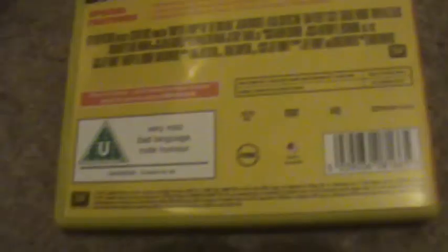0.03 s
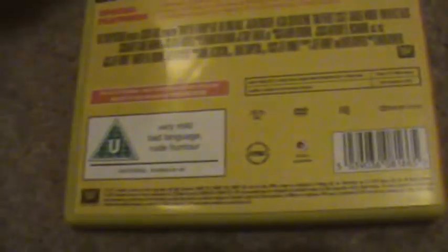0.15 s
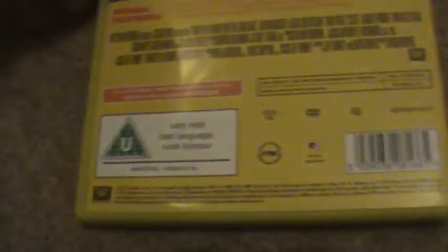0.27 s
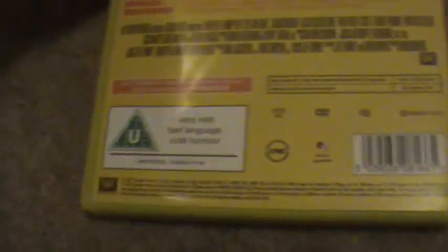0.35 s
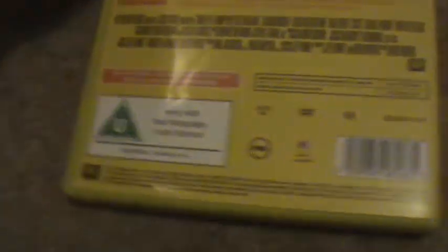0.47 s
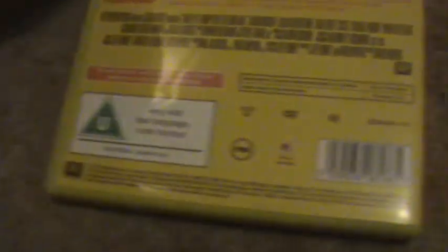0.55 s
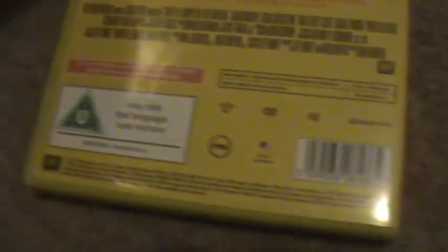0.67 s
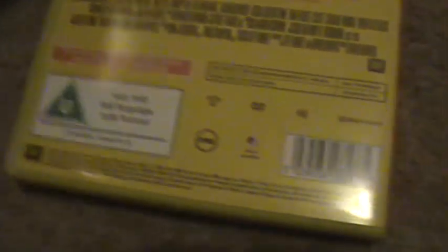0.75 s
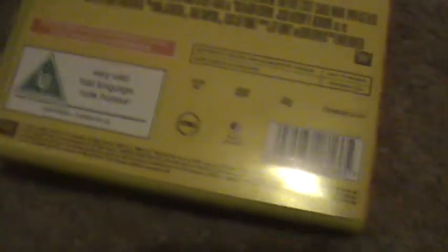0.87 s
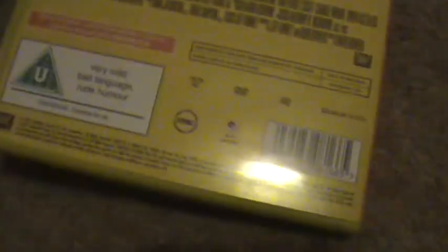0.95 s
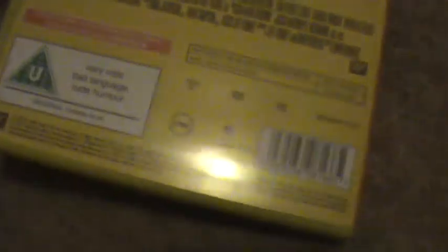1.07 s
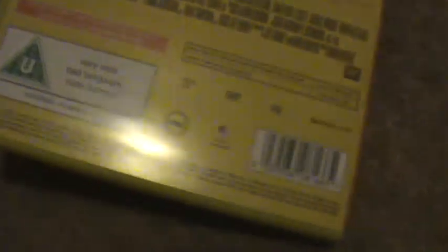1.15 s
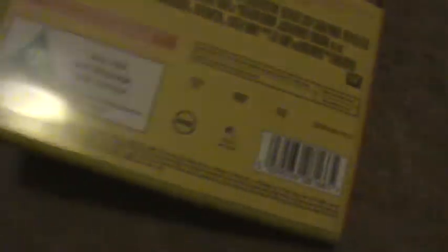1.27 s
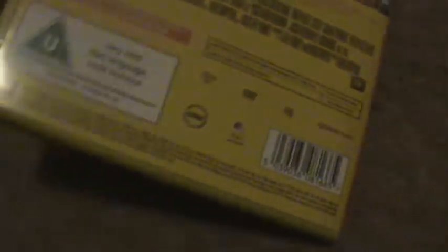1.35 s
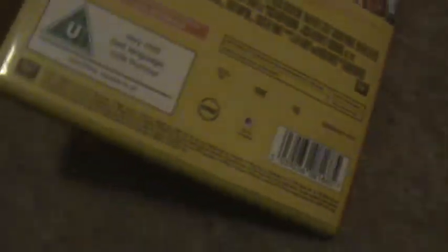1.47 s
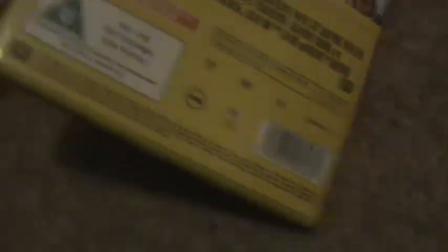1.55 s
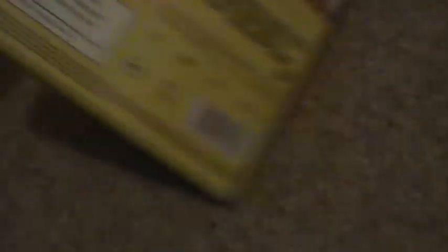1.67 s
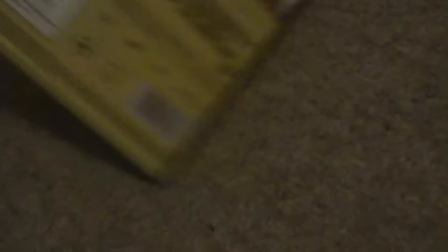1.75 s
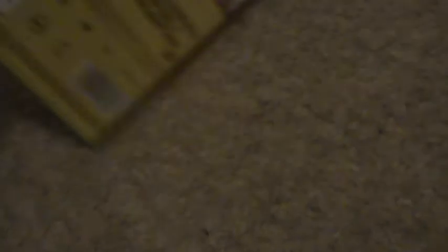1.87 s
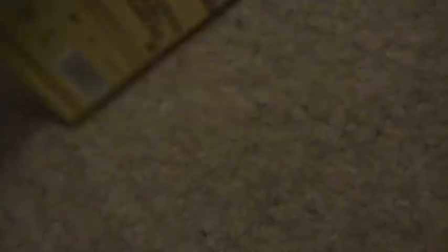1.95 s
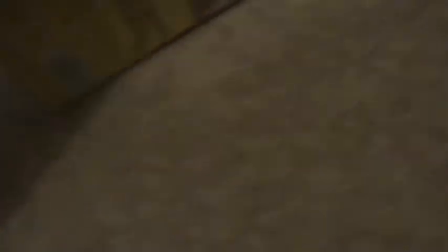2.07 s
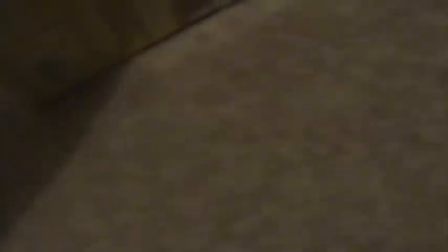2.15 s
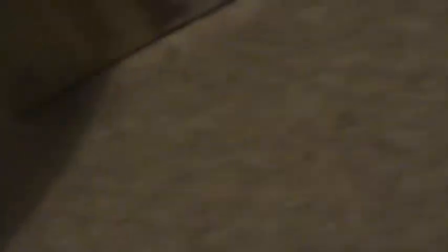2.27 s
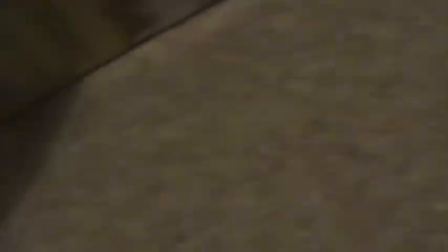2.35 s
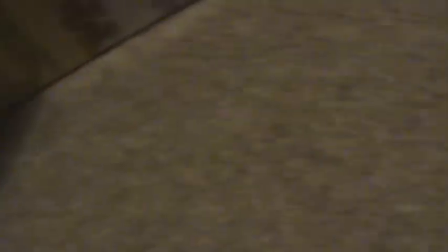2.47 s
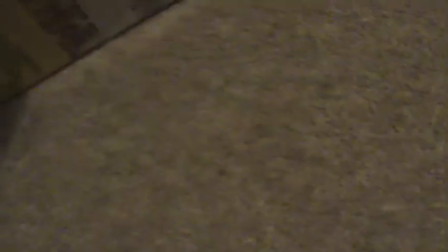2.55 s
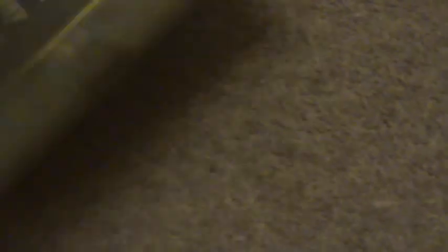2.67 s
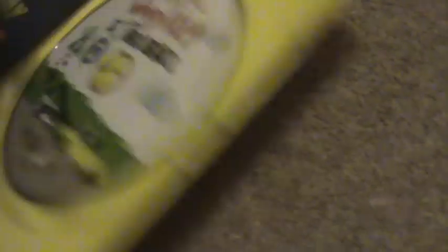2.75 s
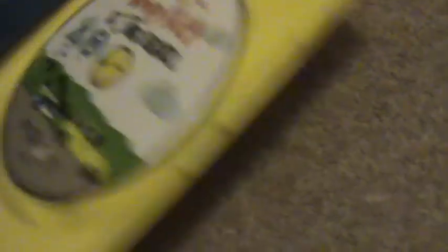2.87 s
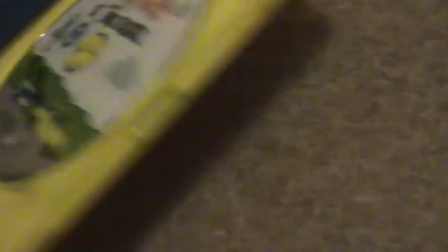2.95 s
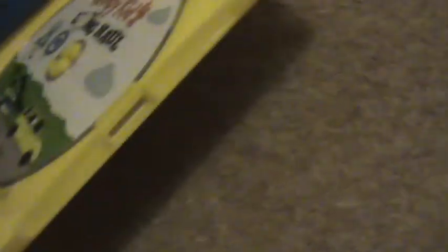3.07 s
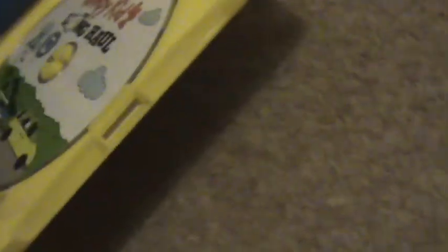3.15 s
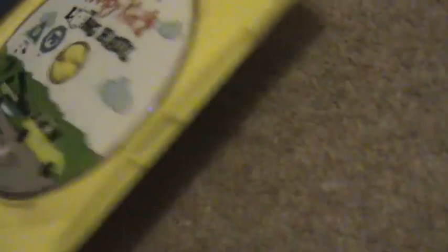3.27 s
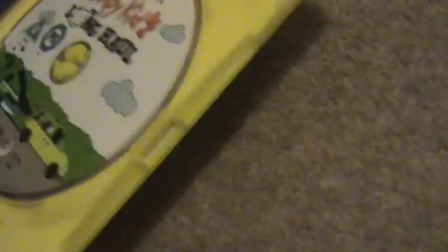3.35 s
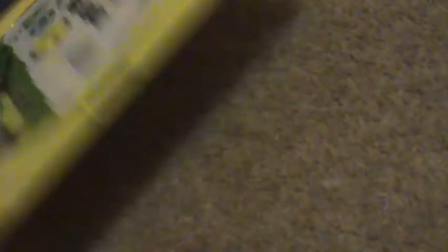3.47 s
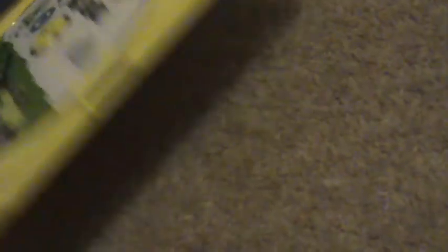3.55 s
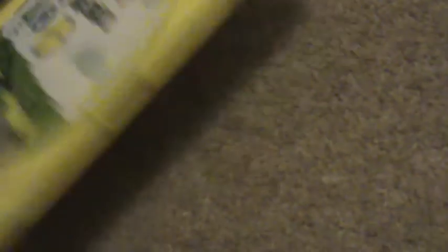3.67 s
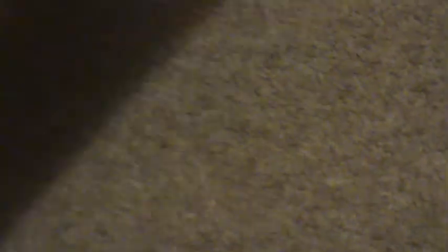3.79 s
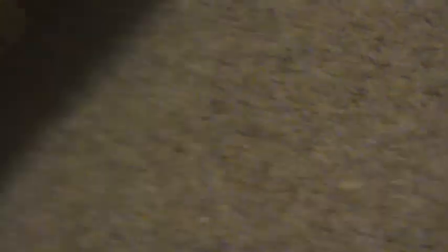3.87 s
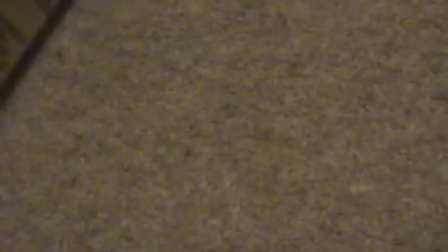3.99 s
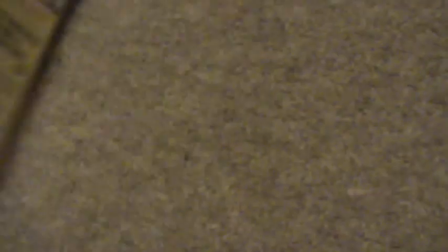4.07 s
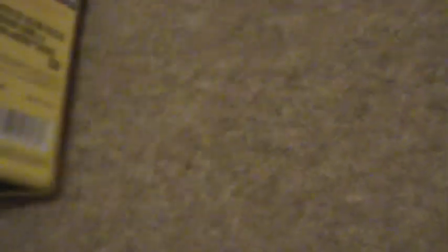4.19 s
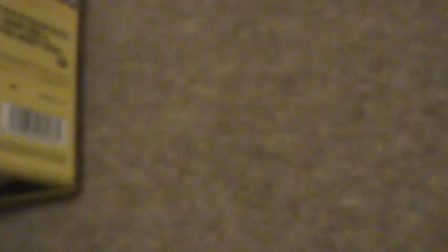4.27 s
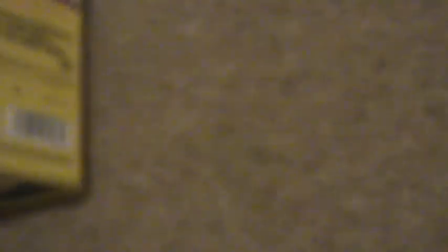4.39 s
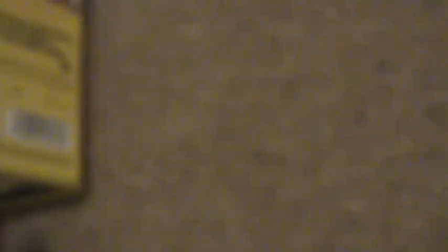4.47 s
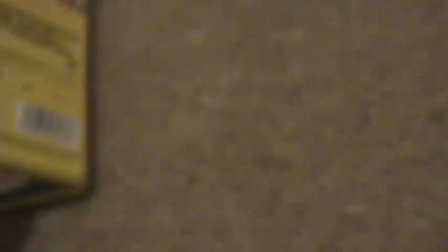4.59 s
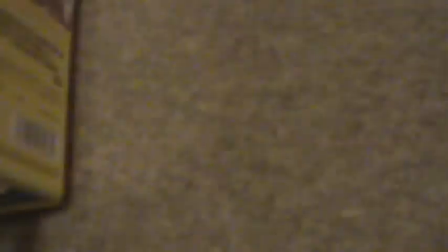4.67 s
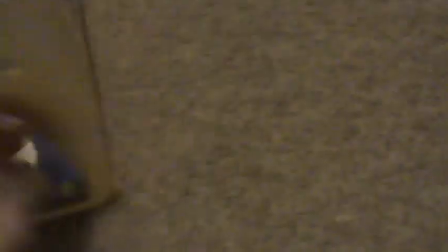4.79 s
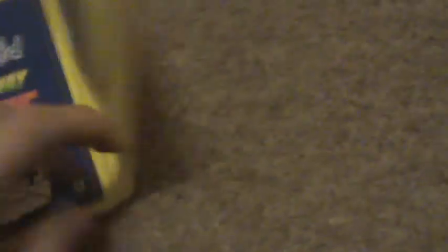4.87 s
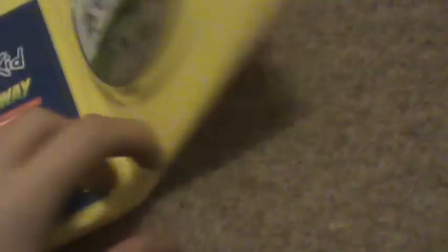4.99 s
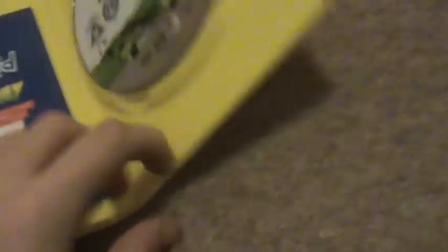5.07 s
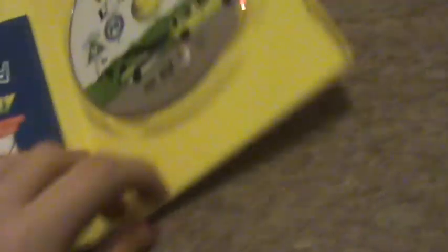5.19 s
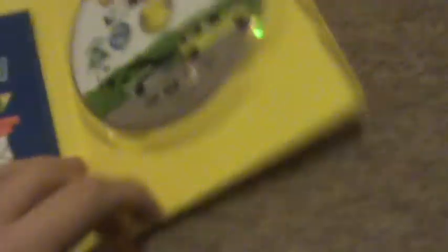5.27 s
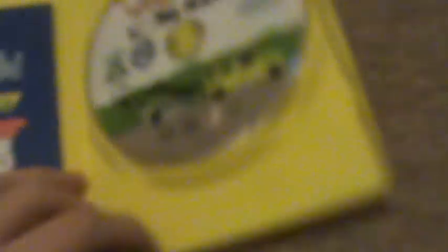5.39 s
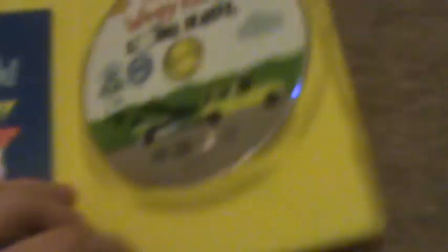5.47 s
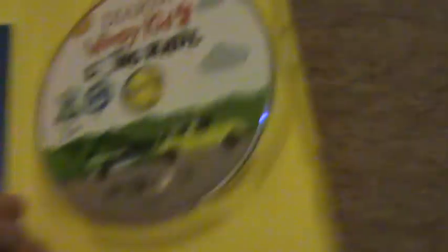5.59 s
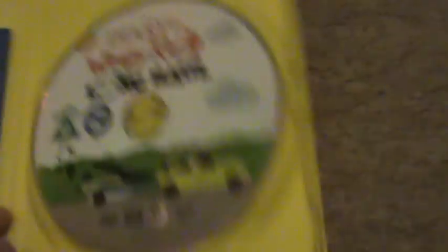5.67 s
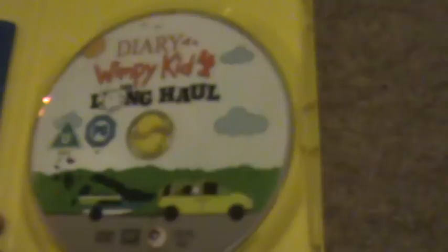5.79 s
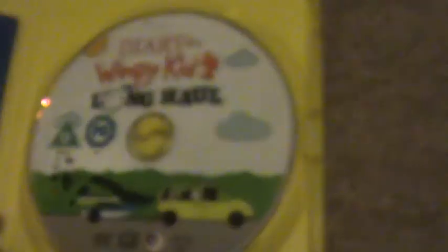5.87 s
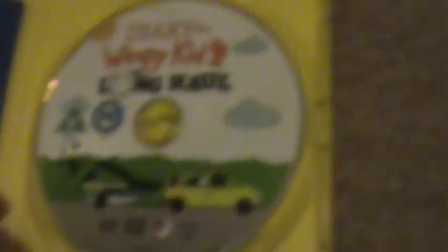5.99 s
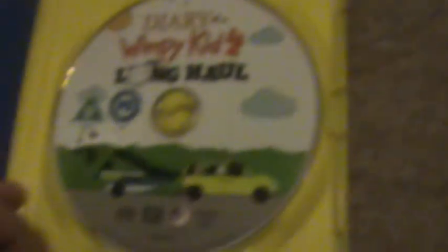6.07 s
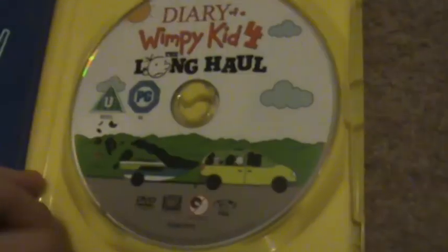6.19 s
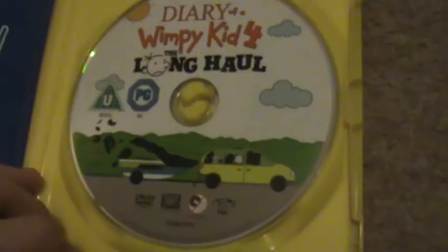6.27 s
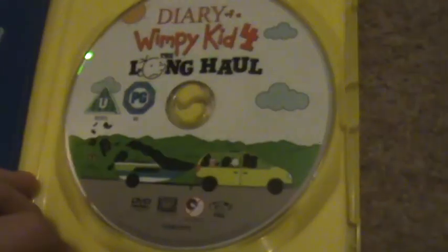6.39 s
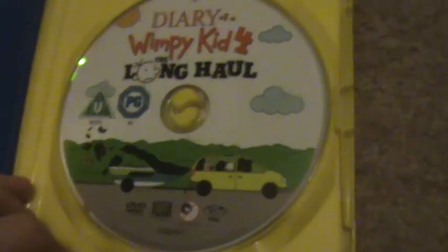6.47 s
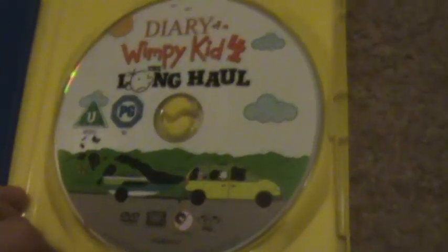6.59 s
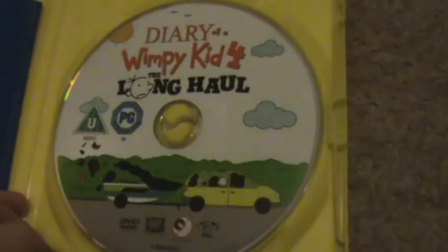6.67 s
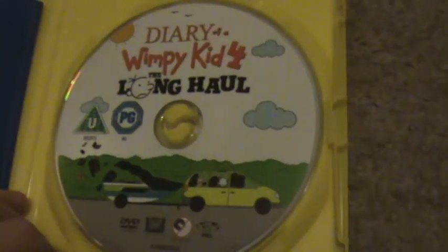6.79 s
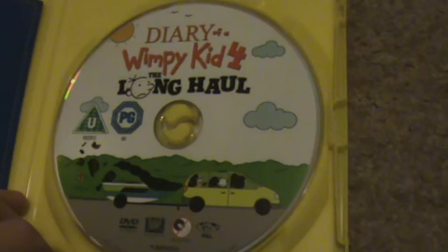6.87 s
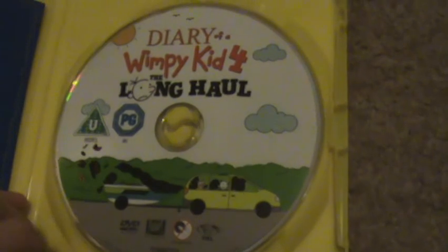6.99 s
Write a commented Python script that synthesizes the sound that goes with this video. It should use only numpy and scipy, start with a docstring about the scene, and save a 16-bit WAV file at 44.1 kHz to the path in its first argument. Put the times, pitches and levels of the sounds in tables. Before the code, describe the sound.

Soft scuffs and dull taps on hollow plastic, a small creak, one loud sharp snap with disc chatter, then lighter clicks and carpet rustling.

```python
"""Soft rubbing and dull knocks come first, then hinge creaks, a loud snap with a chattering disc, and clatter:
a thin plastic disc case is turned over, snapped open and laid down by hand above a carpet in a quiet room.
Knocks, scuffs, creaks and chatter are ticks driven through resonances of the shells; thuds are damped sines.
Fingers and carpet rub as grainy hiss: thousands of tiny slips through a moving bright region.
Under it lie shaped noise (microphone hiss and low rumble) and the wavering sines of a small motor's faint whine."""
import sys
import numpy as np
from scipy import signal
from scipy.fft import rfft, irfft, next_fast_len
from scipy.io import wavfile

SR = 44100
rng = np.random.default_rng(int(sys.argv[2]) if len(sys.argv) > 2 else 0)


def unload_audio(sound):
    """Save the sound as a 16-bit wav file, at the path given as the first command line argument."""
    columns = np.transpose(np.atleast_2d(sound))
    # keep every value between -1 and 1, then stretch to whole-number steps
    steps = np.round(np.clip(columns, -1, 1) * 32767)
    wavfile.write(sys.argv[1], SR, steps.astype(np.int16))


N = 310460  # scene length, samples


def amp(db):
    """Decibels to gain."""
    return 10 ** (np.asarray(db) / 20)


def rms_one(x):
    """Scale to rms 1."""
    return x / np.sqrt(np.mean(x ** 2) + 1e-20)


def peak_one(x):
    """Scale to peak 1."""
    return x / np.abs(x).max()


def in_time(rows):
    """Interpolate each column of a time curve to one value a sample."""
    t_s, *columns = np.transpose(rows)
    return [np.interp(np.arange(N) / SR, t_s, column) for column in columns]


def at_hz(points, hz):
    """Read a spectrum on a log-frequency axis."""
    points_hz, values = np.transpose(points)
    return np.interp(np.log(hz), np.log(points_hz), values)


def add_at(out, t_s, sound):
    """Mix a sound into out at a time."""
    at = round(t_s * SR)
    out[..., at:at + sound.shape[-1]] += sound


def lowpass(x, hz):
    """Second-order low-pass."""
    return signal.lfilter(*signal.butter(2, hz, fs=SR), x)


def highpass(x, hz):
    """Second-order high-pass."""
    return signal.lfilter(*signal.butter(2, hz, "high", fs=SR), x)


def resonate(x, hz, width_hz):
    """Two-pole resonance with gain 1 on top."""
    r = np.exp(-np.pi * width_hz / SR)
    zeros = [(1 - r * r) / 2, 0, (r * r - 1) / 2]
    poles = [1, -2 * r * np.cos(2 * np.pi * hz / SR), r * r]
    return signal.lfilter(zeros, poles, x)


def grains(size, per_s, spread_db):
    """Random ticks of uneven size and sign."""
    sizes = amp(spread_db * np.minimum(rng.exponential(1, size), 4))
    signs = rng.choice([-1, 1], size)
    fires = rng.random(size) < per_s / SR
    return sizes * signs * fires + 1e-18


def drift(rate_hz):
    """Slow random wander, rms 1."""
    r = np.exp(-2 * np.pi * rate_hz / SR)
    slow = signal.lfilter([1], [1, -2 * r, r * r], rng.standard_normal(N + SR))
    return rms_one(slow[SR:])


# resonances of the case: (f/Hz, width/Hz, level/dB)
CASE_MODES = [(246, 176, 0), (650, 400, 6.5), (982, 260, 10.5), (1110, 240, 8.5), (1404, 175, 6.5),
              (1690, 470, 5), (2190, 143, 9.5), (2927, 290, 5), (3750, 370, -1), (4615, 170, 5),
              (6300, 540, -16)]
GRIP_DETUNE, PORTS_DIFFER_DB = 0.055, 2  # random spread per contact: share of pitch, left-right level


def case(force, direct_db=-10):
    """Shell resonances, retuned and re-aimed at the two ports on each call, plus the direct contact."""
    tune = 1 + GRIP_DETUNE * rng.standard_normal(len(CASE_MODES))
    aim_db = PORTS_DIFFER_DB * rng.standard_normal(len(CASE_MODES))
    rings = 0
    for k, (hz, width_hz, db) in enumerate(CASE_MODES):
        ports = amp(aim_db[k] * np.array([[.5], [-.5]]))
        rings = rings + (-1) ** k * ports * amp(db) * resonate(force, hz * tune[k], width_hz)
    return rings + amp(direct_db) * force


CONTACT_HZ, CONTACT_FOLLOWS_EDGE = 6130, 0.13  # softer contact, less treble into the case (dB per edge dB)
CASE_FOLLOWS_EDGE = 0.18  # harder edge, more whole-case ring (dB per edge dB)
EDGE_LEAD_SHARE = 0.41  # gain of the leading tick in the treble
EDGE_FIZZ = 0.33  # gain of the fine edge noise, independent at the two ports


def contact(ring_hz, swell_s, fall_s, edge_db, case_db, lead, ring_width):
    """Cluster of ticks that swells and dies, rings locally and in the whole case, with a treble edge."""
    t = np.arange(SR // 4) / SR
    fall_s = np.clip(fall_s, .004, .3)  # time to -60 dB
    shape = np.minimum(t / swell_s, 1) * amp(-60 * np.maximum(t - swell_s, 0) / fall_s)
    ticks = grains(size=len(t), per_s=3100, spread_db=3.5)
    cluster = shape * (ticks + 0.35 * rng.standard_normal(len(t)))
    lead_at = round(swell_s * SR)
    cluster[lead_at] = lead

    local = resonate(cluster, ring_hz, 90 + ring_width * ring_hz)
    local = resonate(local, ring_hz, 0.34 * ring_hz)

    contact_hz = CONTACT_HZ * amp(CONTACT_FOLLOWS_EDGE * edge_db)
    whole = case(lowpass(lowpass(cluster, contact_hz), contact_hz))

    cluster[lead_at] *= EDGE_LEAD_SHARE
    rough = cluster + EDGE_FIZZ * shape * rng.standard_normal((2, len(t)))
    treble = rough - lowpass(rough, 2740)
    edge = lowpass(lowpass(treble, 10000), 12000)

    whole_gain = amp(case_db + CASE_FOLLOWS_EDGE * edge_db)
    sound = rms_one(local) + whole_gain * rms_one(whole) + amp(edge_db) * rms_one(edge)
    return rms_one(sound) * np.sqrt(np.mean(shape ** 2))


# sharp knocks of the shells: (t/s, nominal peak/dB, local ring f/Hz, fall/s, hard edge re local ring/dB)
KNOCKS = [(0.33, -29, 1270, 0.042, -17), (0.353, -28, 1140, 0.019, -23), (.39, -34.5, 860, 0.011, -38),
          (.461, -28.5, 1030, 0.0067, -30), (0.496, -30, 1030, 0.0087, -16), (0.629, -41.5, 417, 0.04, -26),
          (0.926, -39, 920, 0.021, -20), (2.462, -44, 665, 0.14, -3), (2.5914, -3.5, 1730, 0.023, -11),
          (2.5963, -6, 1084, 0.032, -14), (2.6027, -19, 1470, 0.013, -3), (2.672, -14.5, 3620, 0.055, -4),
          (2.609, -5, 3370, 0.018, 2), (2.983, -35, 1900, 0.014, -12), (3.0501, -29, 1050, 0.029, -41),
          (3.542, -31, 2560, 0.036, -11), (3.588, -23.5, 2930, 0.013, -2), (3.568, -17, 2100, 0.028, -8.5),
          (3.579, -28, 2180, 0.077, -11), (3.745, -25, 2370, 0.22, -6), (3.7522, -19, 3660, 0.041, -4),
          (3.914, -30.5, 3750, 0.2, -0.5), (3.958, -27.5, 2190, 0.044, -41),
          (4.101, -29.5, 3600, 0.051, -28), (4.117, -36, 3180, 0.05, -4), (4.5411, -24, 2650, 0.053, -9.5),
          (4.667, -38, 680, 0.12, 4), (4.719, -29.5, 3040, 0.062, -18), (4.729, -25, 2190, 0.017, -18),
          (4.821, -26.5, 1960, 0.06, -8), (5.9686, -21.5, 780, 0.028, -63)]
# scuffs and creaks: (t/s, nominal peak/dB, local ring f/Hz, swell/s, fall/s, hard edge re local ring/dB)
SCUFFS = [(0.172, -41.5, 460, 0.028, 0.16, -49), (1.334, -38.5, 6200, 0.016, 0.079, 1),
          (2.621, -20, 3530, .029, .035, -8), (2.685, -9, 2150, 0.0063, 0.034, -53),
          (2.698, -17.5, 1490, 0.004, 0.05, -1), (2.915, -37, 1920, 0.0089, 0.12, -23),
          (2.938, -30, 1930, 0.025, 0.057, -11), (2.97, -26, 1740, 0.0089, 0.015, -16),
          (3.021, -37.5, 950, 0.0055, 0.068, -30), (3.04, -32.5, 1700, 0.014, 0.14, -37),
          (3.066, -36, 1520, 0.016, 0.034, -43), (3.314, -46, 1240, 0.016, 0.058, 3),
          (3.382, -38, 1076, 0.0076, 0.27, -34), (3.428, -33, 1210, 0.014, 0.008, -36),
          (3.594, -34.5, 1090, .008, 0.1, 1), (3.765, -18, 3720, 0.0086, 0.074, -8),
          (3.779, -32, 2060, 0.0066, 0.21, -4), (3.894, -31, 2250, 0.0028, 0.029, -6),
          (3.926, -25.5, 1920, 0.0082, 0.041, -4), (4.551, -27.5, 3460, 0.0067, 0.057, -24),
          (4.628, -25.5, 4400, 0.0038, 0.12, 16), (4.633, -23.5, 1030, 0.0044, 0.058, -16),
          (4.694, -31, 3080, 0.026, 0.11, 17), (4.797, -31, 1900, 0.011, 0.27, 3),
          (4.858, -31.5, 2520, .005, 0.06, -5), (4.909, -30, 880, 0.0053, 0.19, -42),
          (4.911, -25.5, 2200, 0.0079, 0.17, 6.5), (4.938, -32, 905, 0.0054, 0.1, -42),
          (5.048, -39.5, 470, 0.015, 0.2, -55), (5.775, -45, 3770, 0.0036, 0.34, -1)]
KNOCK_SWELL_S = 0.0006
PEAK_TO_LEVEL_DB = -7.5


def knocks():
    """Knocks start at once with a big leading tick; scuffs build up and ring broader."""
    out = np.zeros((2, N + SR))
    for t_s, db, hz, fall_s, edge_db in KNOCKS:
        sound = contact(hz, KNOCK_SWELL_S, fall_s, edge_db, case_db=1.5, lead=4.1, ring_width=0.072)
        add_at(out, t_s, amp(db + PEAK_TO_LEVEL_DB) * sound)
    for t_s, db, hz, swell_s, fall_s, edge_db in SCUFFS:
        sound = contact(hz, swell_s, fall_s, edge_db, case_db=5, lead=1.2, ring_width=.13)
        add_at(out, t_s, amp(db + PEAK_TO_LEVEL_DB) * sound)
    return out[:, :N]


CHATTER_S, CHATTER_HOLD_S, CHATTER_DB = 2.617, 0.06, -25  # the loose disc, after the latch lets go
CHATTER_FALL_DB_PER_S, SETTLE_DB, SETTLE_DB_PER_S = 274, -42, 59
SETTLE_CUT_HZ = 5600  # settling sounds duller


def chatter():
    """Dense ticks into the case: sudden start, short hold, fast fall, slow settling."""
    since_s = np.arange(N) / SR - CHATTER_S
    after_s = np.maximum(since_s - CHATTER_HOLD_S, 0)
    ticks = lowpass(grains(size=N, per_s=3800, spread_db=1.0), 7000)
    sound = rms_one(case(ticks, direct_db=-5.0))
    sound = rms_one(highpass(sound, 850))  # a small disc has no bass
    burst = amp(CHATTER_DB - CHATTER_FALL_DB_PER_S * after_s) * sound
    settling = amp(SETTLE_DB - SETTLE_DB_PER_S * after_s) * lowpass(sound, SETTLE_CUT_HZ)
    flutter = amp(2.0 * drift(120))
    return (since_s > 0) * flutter * (burst + settling)


# single slips of the hinge as the case is turned: (t/s, peak level/dB, bright snap re ring/dB)
SLIPS = [(1.694, -27.5, -8), (1.732, -25, -4.5), (1.766, -34, -19), (1.7702, -26.5, -9),
         (1.781, -31.5, -19), (1.7945, -37, -17), (1.807, -30, -17), (1.816, -29, -6), (1.895, -37.5, -6)]
# resonances of the closed, hollow case: (f/Hz, width/Hz, level/dB)
HOLLOW_MODES = [(187, 59, 10.5), (337, 150, 5), (637, 85, 11), (1180, 220, 7), (1920, 350, 6),
                (2450, 140, 8.5), (3040, 87, 3.5), (3750, 580, -1)]
SLIP_DIES_S, SLIP_TAIL = 0.09, 0.43  # trail: time to -60 dB, gain re first tick
SNAP_HZ, SNAP_WIDTH_HZ = 3780, 300


def creak():
    """Each slip drives the hollow case with a tick and a dying trail, plus a short bright snap."""
    out, t = np.zeros(N + SR), np.arange(SR // 5) / SR
    snap = resonate(1. * (t == 0), SNAP_HZ, SNAP_WIDTH_HZ)
    snap = peak_one(resonate(snap, SNAP_HZ, SNAP_WIDTH_HZ))
    for t_s, db, snap_db in SLIPS:
        trail = grains(size=len(t), per_s=2000, spread_db=1.5)
        force = SLIP_TAIL * amp(-60 * t / SLIP_DIES_S) * trail
        force[0] = 1
        force = lowpass(force, 6200)
        ring = amp(-40) * force
        for k, (hz, width_hz, mode_db) in enumerate(HOLLOW_MODES):
            gain = amp(mode_db + 3.3 * rng.standard_normal())
            ring += (-1) ** k * gain * resonate(force, hz, width_hz)
        sound = peak_one(ring) + amp(snap_db) * snap
        add_at(out, t_s, amp(db) * peak_one(sound))
    return out[:N]


# soft thuds of the whole case: (t/s, level before envelope and low-pass/dB, f/Hz)
THUDS = [(0.389, -37, 343), (1.722, -36, 230), (2.462, -39.5, 103), (2.595, -30, 44.8), (2.598, -22.5, 227),
         (2.644, -32.5, 110), (2.9, -36.5, 49.3), (2.96, -38, 297), (3.561, -31, 62), (3.771, -25.5, 398),
         (3.934, -33.5, 434), (4.54, -31, 248), (4.668, -34, 295), (4.815, -29.5, 93), (5.072, -40, 390)]


def thuds():
    """Heavily damped low sines, faster to die the higher they are, softened by a low-pass."""
    out, t = np.zeros(N + SR), np.arange(SR // 5) / SR
    for t_s, db, hz in THUDS:
        damping = np.exp(-t * (.5 * hz + 70))
        add_at(out, t_s, amp(db) * np.sin(2 * np.pi * hz * t) * damping)
    return lowpass(out[:N], 730)


# ticks of fingertips on the glossy sleeve: (t/s, peak level/dB, f/Hz)
TICKS = [(.159, -43.5, 2160), (.942, -47.5, 2870), (1.044, -50, 2820), (1.4624, -47.5, 2450),
         (1.5326, -42.5, 2350), (1.589, -42.5, 2420), (3.89, -36.5, 2200), (4.089, -42, 2490),
         (4.883, -36, 2480), (5.9692, -46, 2750), (6.9022, -48, 2630), (6.983, -47.5, 2580)]
STRAY_TICKS_PER_S, STRAY_TICK_DB = 5, -55  # fainter ticks at random times
STRAY_HZ, STRAY_SPREAD_HZ = 2380, 360


def faint_ticks():
    """Short dying puffs of noise, each in one resonance."""
    out = np.zeros(N + SR)
    fade = np.exp(-np.arange(SR // 20) / SR / 0.0032)
    ticks = list(TICKS)
    for t_s in np.cumsum(rng.exponential(1, 80)) / STRAY_TICKS_PER_S:
        if t_s < N / SR:
            ticks.append((t_s, STRAY_TICK_DB, STRAY_HZ + STRAY_SPREAD_HZ * rng.uniform(-1.3, 1)))
    for t_s, db, hz in ticks:
        puff = fade * rng.standard_normal(len(fade))
        tick = resonate(resonate(puff, hz, 420), hz, hz)
        add_at(out, t_s, amp(db) * peak_one(tick))
    return out[:N]


# rubbing of fingers and carpet, a curve: (t/s, level/dB, brightest f/Hz)
RUB = [(0, -56, 2740), (.33, -51, 2270), (.6, -58, 2370), (1.2, -63, 2000), (1.85, -51.5, 2830),
       (1.97, -57, 3460), (2.1, -51, 5640), (2.2, -53, 5130), (2.25, -64.5, 3160), (2.6, -60, 2000),
       (3.1, -60, 1700), (3.3, -65, 2000), (3.55, -54.5, 3620), (3.7, -59, 2500), (4.2, -49, 3800),
       (4.42, -54.5, 3550), (4.8, -49, 4160), (5.2, -56.5, 2000), (5.33, -49.5, 1930), (5.86, -54.5, 2520),
       (5.92, -65, 2060)]


def rub():
    """Fibres slip by the thousand; patchy resonant bands are weighted around a moving bright region."""
    level_db, bright_hz = in_time(RUB)
    mid, side = lowpass(grains(size=(2, N), per_s=7000, spread_db=1.5), 7930)
    slips = mid + 0.47 * side * [[1], [-1]]
    out = 0
    for hz in np.geomspace(350, 12000, 12):
        patches = amp(2.3 * drift(2.4) + 1.7 * drift(25.))
        octaves_off = np.log2(hz / bright_hz)
        share = patches / (1 + (octaves_off / 2.9) ** 2)
        out = out + share * resonate(slips, hz, 0.5 * hz) / np.sqrt(hz)
    return amp(level_db) * rms_one(out)


ROOM_T60_S, WALL_CUT_HZ = 0.21, 11000  # T60 at low frequencies


def room(x):
    """Echo from sixteen feedback delays a side, duller on every round, computed as spectra."""
    size = next_fast_len(N + SR)
    w = 2 * np.pi * np.arange(size // 2 + 1) / size  # rad/sample
    dull = 1 / (1 + 1j * w * SR / (2 * np.pi * WALL_CUT_HZ))
    response = np.zeros((2, len(w)), complex)
    lags = (rng.uniform(0.0032, 0.026, 32) * SR).astype(int)
    for k, lag in enumerate(lags):
        loss = amp(-60 * lag / SR / ROOM_T60_S)
        loop = loss * np.sqrt(dull) * np.exp(-1j * w * lag)
        response[k % 2] += (-1) ** (k // 2) * loop / (1 - loop)
    return irfft(response * rfft(x, size), size)[:, :N]


# wavering tones of the small motor: (f/Hz, rms wander/Hz, mean level/dB)
WHINE = [(69.6, 1.86, -61), (102.7, 2.22, -62), (324, 3.84, -62.5), (835, 6.11, -67), (1182, 22, -75.5),
         (1790, 4.07, -74.5), (2030, 13.4, -75.5)]


def whine():
    """Sines that wander in pitch and swell a little."""
    out = 0
    for hz, wander_hz, db in WHINE:
        phase = 2 * np.pi * np.cumsum(hz + wander_hz * drift(8.05)) / SR
        out = out + amp(db + 2 * drift(7.1)) * np.sin(phase)
    return out


# background spectrum: (f/Hz, relative density/dB per Hz)
HISS = [(20, -1), (40, -21.5), (90, -9.5), (220, -13), (520, -23), (900, -18), (1500, -26.5), (3500, -37),
        (16000, -37)]
# left-right likeness of the background: (f/Hz, correlation 0-1)
HISS_LIKENESS = [(60, 1), (250, 0.97), (700, 0.021), (2000, 0.011), (12000, 0.41)]
HISS_DB = -57  # overall rms


def background():
    """Microphone hiss and low rumble: stereo noise in half-octave bands."""
    lows_hz = 20 * 2 ** np.arange(0, 10, .5)
    highs_hz = np.append(lows_hz[1:], 19000.)
    white = rng.standard_normal((2, 2, N))  # neighbouring bands use different noise
    out = 0
    for k, (low_hz, high_hz) in enumerate(zip(lows_hz, highs_hz)):
        band = signal.butter(2, [low_hz, high_hz], "band", fs=SR, output="sos")
        mid, side = signal.sosfilt(band, white[k % 2])
        hz = np.sqrt(low_hz * high_hz)
        alike = at_hz(HISS_LIKENESS, hz)
        stereo = np.sqrt(1 + alike) * mid + np.sqrt(1 - alike) * side * [[1], [-1]]
        out = out + amp(at_hz(HISS, hz)) * stereo
    return amp(HISS_DB) * rms_one(out)


# where the case is, a curve: (t/s, left minus right level/dB)
PLACE = [(0, 3.5), (.5, -2), (2.5, 0.7), (3.6, 1), (4.15, 2), (4.9, 1), (5.2, 0.4), (7, -2)]
RIGHT_LATE = .12  # samples
ROOM_DB = -25  # echo gain


def scene():
    """The case moves about near the microphone; add its room echo and the background."""
    near = knocks() + creak() + thuds() + chatter() + faint_ticks()
    echo = room(near.mean(axis=0))
    echo -= 0.45 * lowpass(echo - echo.mean(axis=0), 1700)  # two close ports hear more alike bass
    right = signal.lfilter([1 - RIGHT_LATE, RIGHT_LATE], [1], near[1])
    ports = np.array([near[0], right])
    side_db, = in_time(PLACE)
    placed = (ports + rub()) * amp(side_db * [[.5], [-.5]])
    return placed + amp(ROOM_DB) * echo + background() + whine()


MIC_LOW_HZ, CUTOFF_HZ = 30.2, 16050


def record(dry):
    """The microphone thins the deepest bass; the top is cut steeply."""
    thin = highpass(dry, MIC_LOW_HZ)
    steep = signal.cheby2(20, 70, CUTOFF_HZ, fs=SR, output="sos")
    return signal.sosfilt(steep, thin)


dry = scene()
out = record(dry)
unload_audio(out)
```